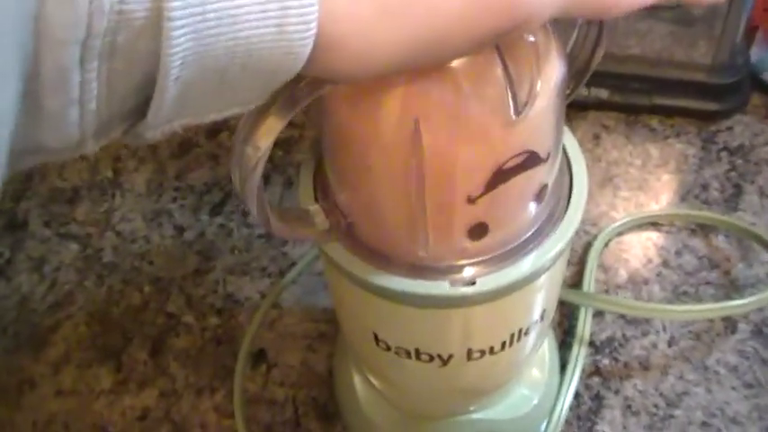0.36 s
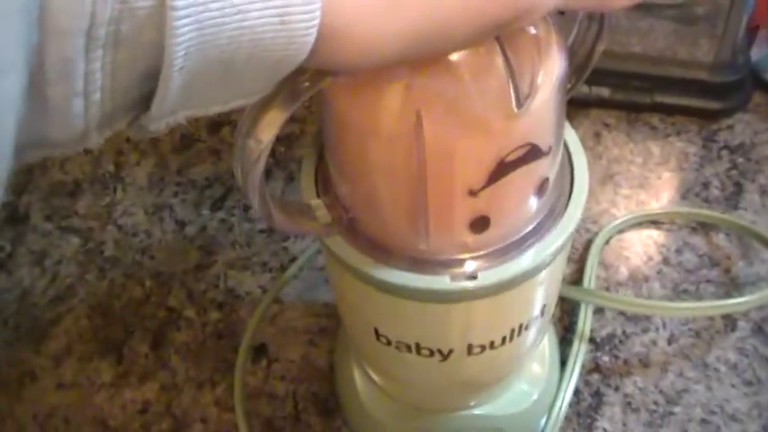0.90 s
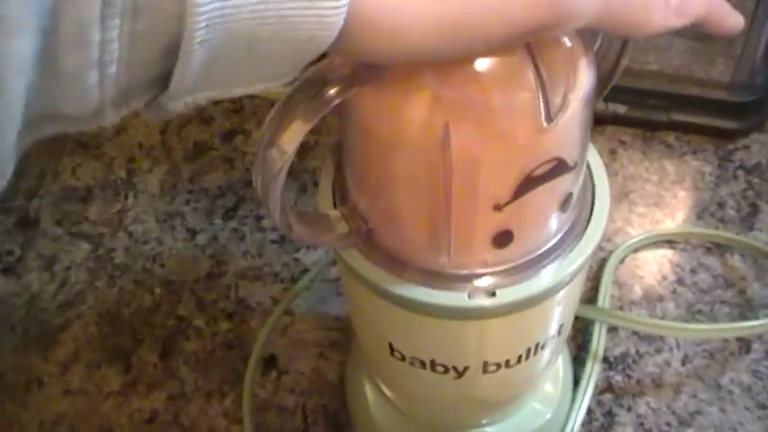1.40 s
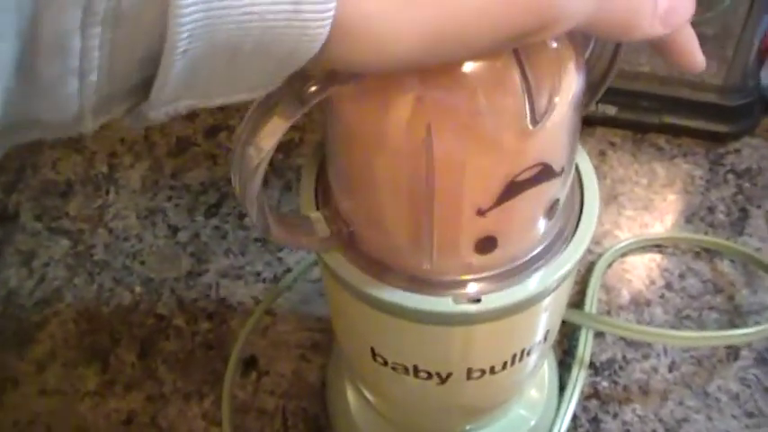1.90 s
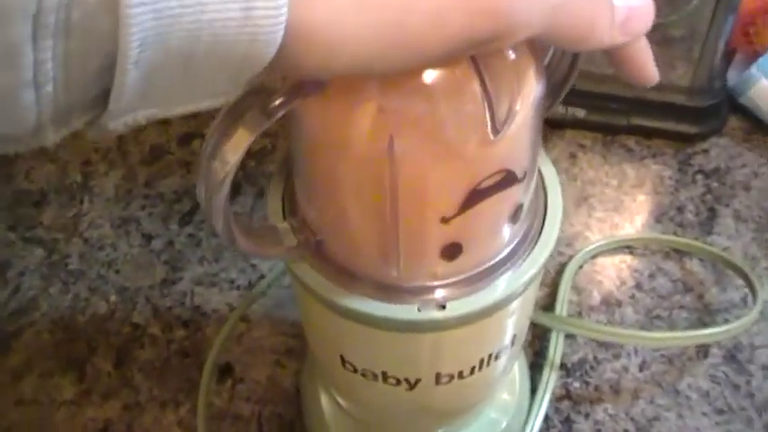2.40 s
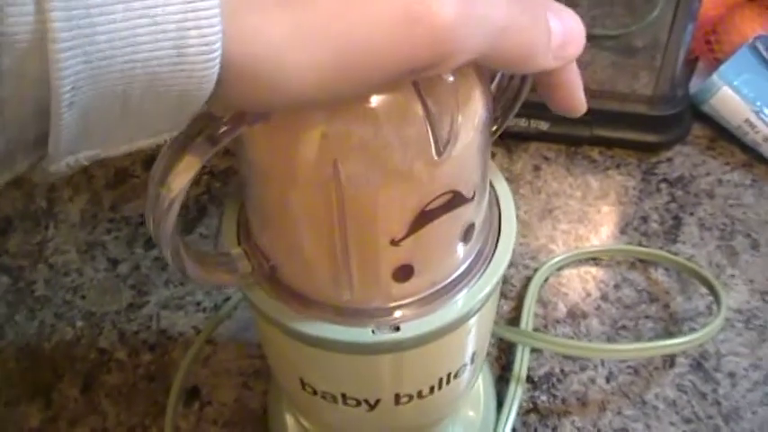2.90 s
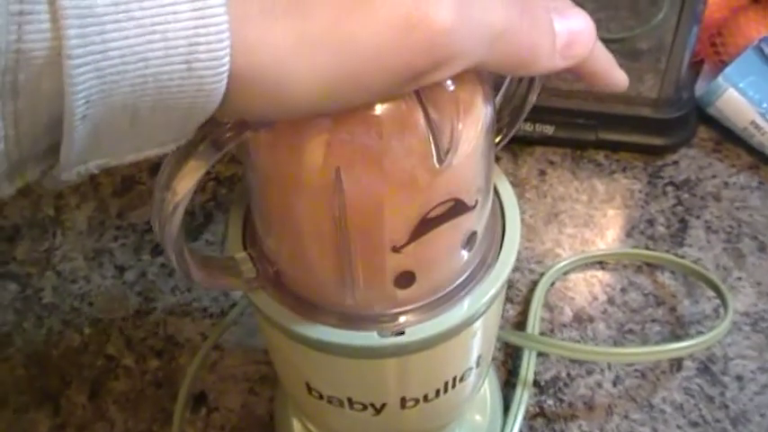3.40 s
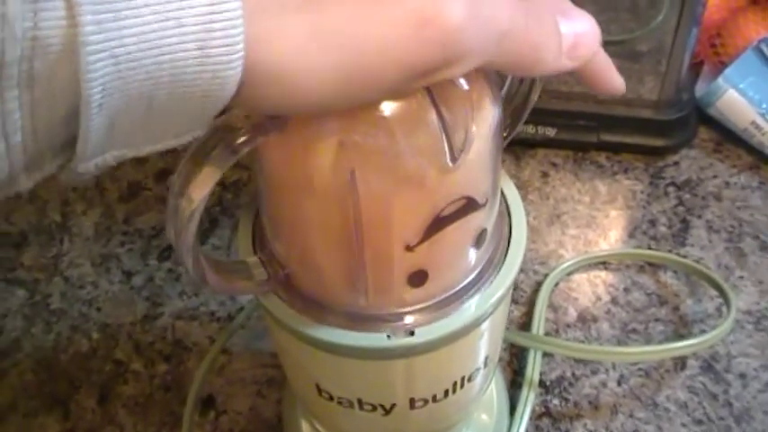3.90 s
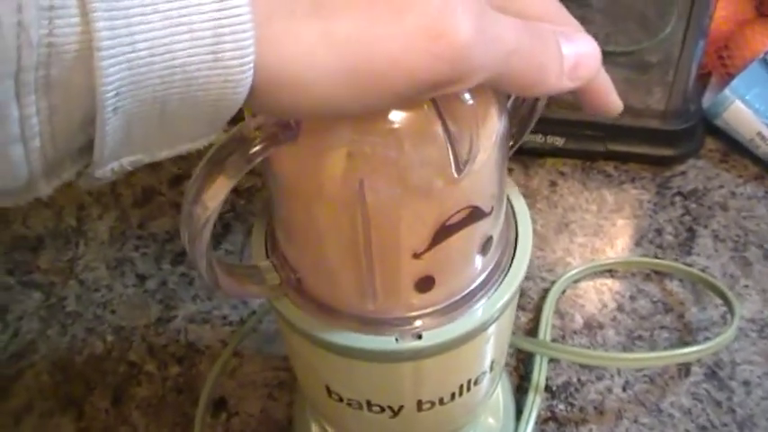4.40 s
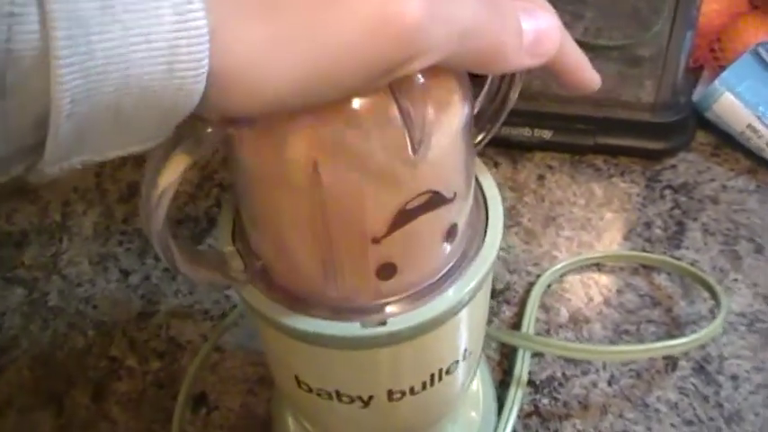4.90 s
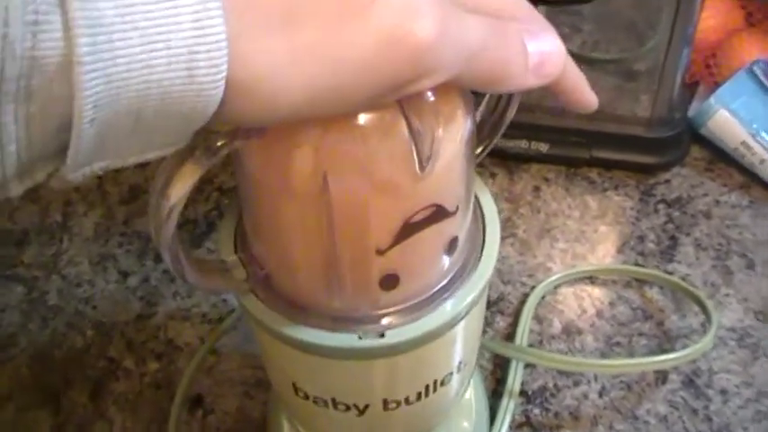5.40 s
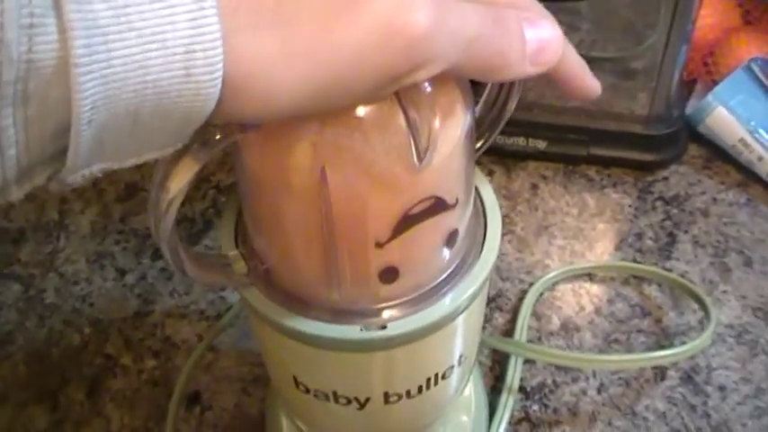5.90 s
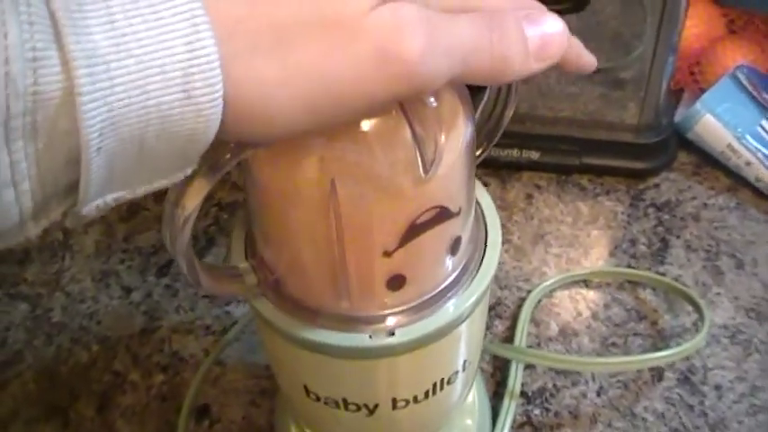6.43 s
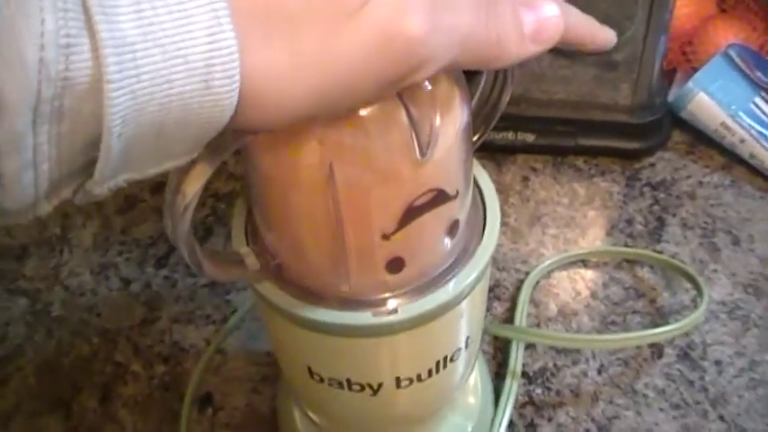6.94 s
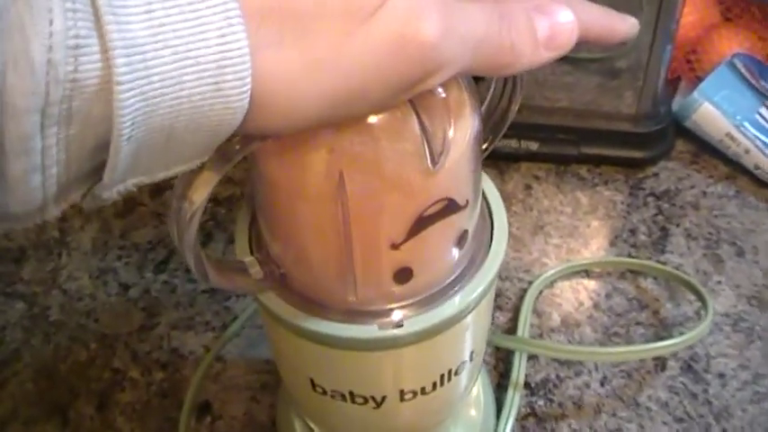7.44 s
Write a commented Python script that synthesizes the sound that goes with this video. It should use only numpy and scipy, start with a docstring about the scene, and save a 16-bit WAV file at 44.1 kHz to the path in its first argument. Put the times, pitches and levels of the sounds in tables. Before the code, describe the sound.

A close, bright, slightly overloaded take of a small blender grinding hard dried pieces in a quiet kitchen. At first a coasting blade drops a few knocks. At 0.2 s the motor kicks in with a crack and runs to 1.15 s, a dense gritty clatter on plastic with faint hum beneath; the rattle then thins, a high metallic whine sagging, until 1.7 s. A second burst lasts to 2.25 s and dies away into near silence by 2.8 s, with a soft tick at 3.0. A third, from 3.2 to 3.8 s, coasts down to stray knocks and a tiny metal clink at 4.3. Light cup ticks come around 4.6 to 4.8, then bursts at 4.84 to 5.4 and 5.55 to 6.1 s, nearly joined. Knocks thin out until 6.6 s, when the final thumping start rattles on to the end at 7.5 s.

```python
"""Pulsed blender

A small blender is pulsed by hand on a stone counter, grinding hard dried pieces to powder.
The blade flings pieces against the plastic cup: noise bursts ring its resonances, densely under power,
thinning out to lone knocks as the blade coasts down with a sagging whine. Sine tones make the mains hum
and a faint shaft tone below; shaped noise makes the quiet kitchen behind."""
import sys
import numpy as np
from scipy import signal
from scipy.fft import rfft, irfft
from scipy.io import wavfile
from scipy.ndimage import uniform_filter1d

SR = 44100
rng = np.random.default_rng(int(sys.argv[2]) if len(sys.argv) > 2 else 0)


def wav_out(sig):
    """Save sig, one row per channel (or a flat mono array), as 16-bit PCM at SR to the path in sys.argv[1]."""
    wavfile.write(sys.argv[1], SR, np.round(np.clip(np.atleast_2d(sig).T, -1, 1) * 32767).astype(np.int16))


def ratio(d):
    """dB to gain"""
    e = np.asarray(d, float) / 20
    return 10 ** e


N = 333022

# motor under power: on t/s, off t/s, shaft speed it heads for f/Hz, shaft tone level/dB before its wavering
POWER = [(0.214, 1.151, 259, -63.5), (1.727, 2.25, 257.8, -64), (3.219, 3.798, 251.2, -62),
         (4.838, 5.381, 255, -78), (5.551, 6.097, 267.3, -69), (6.643, 7.544, 269.3, -61)]
# resonances of cup wall, blade and cup body: f/Hz, width/Hz of the narrower of two stages, level/dB
WALL = [(3600, 380, -14.5), (3880, 457, -7), (4475, 720, -13), (6730, 520, -5.5), (7700, 710, -7),
        (8650, 950, -4), (9790, 1700, -11.5), (10280, 1200, -6), (11350, 1900, -8.5), (12170, 900, -8.5),
        (13800, 580, -11), (15200, 1200, -17)]
BLADE = [(4310, 630, -14.5), (4700, 640, -8), (5039, 274, -2.5)]
BODY = [(251.7, 89, -27.5), (377, 71, -15), (479, 88, -13), (590, 35, -7.5), (740, 230, -13.5),
        (859, 30, -14), (998, 34, -10.5), (1130, 320, -18), (1554, 390, -10.5), (2196, 263, -2),
        (2370, 170, -5.5), (2630, 1330, -10.5)]
HUM_HZ = 119.17  # twice the mains
STRAIN_S = 0.37  # the straining motor shakes body and hum harder just after it starts


def rms_one(x):
    """Scale to rms 1."""
    return x / np.sqrt(np.mean(x ** 2) + 1e-20)


def curve(rows):
    """Draw straight lines through (t/s, value) points, sample by sample."""
    s, values = np.transpose(rows)
    return np.interp(np.arange(N) / SR, s, values)


def smooth(x, seconds):
    """One-pole low-pass: a jump is followed with this time constant."""
    r = np.exp(-1 / (seconds * SR))
    return signal.lfilter([1 - r], [1, -r], x + 1e-18)


def drift(rate_hz):
    """Random wandering of rms 1: noise through two low-pass poles at this rate."""
    seconds = 1 / (2 * np.pi * rate_hz)
    return rms_one(smooth(smooth(rng.standard_normal(N), seconds), seconds))


def resonate(x, hz, width_hz):
    """Two-pole resonance with a gain of about 1 at its peak."""
    r = np.exp(-np.pi * width_hz / SR)
    zeros = (1 - r * r) / 2 * np.array([1, 0, -1])
    poles = [1, -2 * r * np.cos(2 * np.pi * hz / SR), r * r]
    return signal.lfilter(zeros, poles, x)


def scatter(at, sizes, modes, spread_db, burst_s, powder=0.):
    """Every blow is a short crunch of noise and strikes each resonance with a strength of its own;
    powder adds an even swirl under the blows."""
    out = 0
    luck = rng.standard_normal((len(at), len(modes)))
    white = rng.standard_normal(N)
    for k, (hz, width_hz, level_db) in enumerate(modes):
        strikes = sizes * ratio(spread_db * luck[:, k])
        power = smooth(np.bincount(at, strikes ** 2, N), burst_s)
        # each resonance reads the noise from another place
        crunch = np.sqrt(power + powder * power.mean()) * np.roll(white, k * SR // 2)
        ring = resonate(resonate(crunch, hz, 2 * width_hz), hz, width_hz)
        out = out + ratio(level_db) * ring
    return out


def powered():
    """1 while current flows, 0 while the blade coasts, with soft edges."""
    t = np.arange(N) / SR
    return smooth(sum(1. * (t > on) * (t < off) for on, off, _, _ in POWER), .01)


def since_start():
    """Seconds since the motor was last switched on; very long before the first start."""
    t, on = np.arange(N) / SR, np.array(POWER)[:, 0]
    return t - np.append(-SR, on)[np.searchsorted(on, t)]


def coasting():
    """Climbs from 0 towards 1 once the current is cut; the blade already coasts at the beginning."""
    climb_s = .2
    t, off = np.arange(N) / SR, np.array(POWER)[:, 1]
    since_off = t - np.append(-.5, off)[np.searchsorted(off, t)]
    return (1 - np.exp(-since_off / climb_s)) * (1 - powered())


def dips():
    """Sudden losses of level that heal exponentially, in dB, for rattle, whine and motor."""
    # drops right after some hard cracks: t/s, depth/dB before the onset is softened
    drops = [(0.43, 13), (2.005, 4.5), (2.165, 4.5), (3.235, 8.5), (3.344, 9.5), (3.576, 7.5), (3.782, 6.5),
             (4.878, 10), (4.99, 7), (5.31, 2.5), (6.685, 7)]
    recover_s = 0.11
    s, depth_db = np.transpose(drops)
    r = np.exp(-1 / (recover_s * SR))
    onsets = np.bincount((s * SR).astype(int), depth_db, N)
    return -smooth(signal.lfilter([1], [1, -r], onsets + 1e-18), .003)


def rattle_db():
    """Rattle level on the cup wall: each run starts at once and holds its last level until the next."""
    # one curve per run of the blade: t/s, level/dB before the dips
    runs = [
        [(0, -22.5), (.025, -33), (.055, -27.5), (.13, -44), (.2, -52)],
        [(.218, -26.5), (.3, -17), (.43, -21), (.62, -25.5), (.72, -22), (.77, -19.5), (1.0, -19.5),
         (1.2, -23.5), (1.45, -30.5), (1.53, -34), (1.59, -45), (1.65, -50.5), (1.71, -50)],
        [(1.727, -17.5), (2.0, -19.5), (2.15, -20), (2.32, -25.5), (2.5, -33), (2.56, -41.5), (2.64, -50),
         (2.73, -68.5), (2.85, -91)],
        [(3.219, -19.5), (3.3, -15.5), (3.55, -18.5), (3.76, -21.5), (3.9, -28), (4.06, -34), (4.12, -44.5),
         (4.2, -49), (4.25, -61), (4.31, -63), (4.4, -90)],
        [(4.838, -19), (4.96, -18), (5.2, -22), (5.4, -24), (5.48, -30)],
        [(5.5, -27.5), (5.56, -26.5), (5.58, -22), (5.76, -20.5), (6.0, -21.5), (6.15, -27), (6.33, -31.5),
         (6.42, -38.5), (6.5, -40.5), (6.57, -57.5), (6.63, -45)],
        [(6.645, -17.5), (6.8, -18), (7.0, -21.5), (7.2, -21), (7.35, -22.5), (7.55, -23)],
    ]
    t, out = np.arange(N) / SR, np.zeros(N)
    for run in runs:
        out = np.where(t >= run[0][0], curve(run), out)
    return smooth(out - out[0], 0.0012) + out[0] + dips()


def kitchen():
    """Dull noise of changing level with a few wavering appliance tones, made of narrow noise bands."""
    # level of the murmur: t/s, level/dB
    murmur = [(0, -57.5), (1.6, -66.5), (1.72, -55), (2.7, -69.5), (2.85, -66.5), (3.2, -56.5), (4.2, -69),
              (4.4, -66.5), (4.6, -54.5), (4.83, -54.5), (6.5, -70.5), (6.64, -52), (7.55, -69)]
    # colour of the noise: f/Hz, relative level/dB per Hz
    colour = [(20, -30), (60, -26), (120, -10), (200, -10), (400, -8), (900, -15), (1300, -20),
              (2500, -22.5), (3500, -28), (6000, -30.5), (11000, -31.5), (16000, -43.5)]
    # appliance tones: f/Hz, width/Hz of each of two equal stages, level/dB re murmur
    appliance_tones = [(118.9, 4.4, -13.5), (356, 8, -9), (744, 8, -9), (890, 11, -13), (9100, 200, -21.5),
                       (11040, 500, -21.5)]
    hz, level_db = np.transpose(colour)
    grid_hz = np.maximum(np.fft.rfftfreq(N, 1 / SR), 1)
    gain = ratio(np.interp(np.log(grid_hz), np.log(hz), level_db))
    noise = rms_one(irfft(rfft(rng.standard_normal(N)) * gain, N))
    tones = 0
    for f, width_hz, db in appliance_tones:
        band = resonate(resonate(rng.standard_normal(N), f, width_hz), f, width_hz)
        tones = tones + ratio(db) * rms_one(band)
    return ratio(curve(murmur)) * (noise + tones)


def room(x):
    """Reflections off counter and walls: a dying, dulled noise tail."""
    t60_s, level_db = 0.14, -15
    t = np.arange(SR // 3) / SR
    tail = smooth(rng.standard_normal(len(t)), .00003) * ratio(-60 * t / t60_s) * (t > .003)
    return ratio(level_db) * signal.fftconvolve(x, tail / np.sqrt(np.sum(tail ** 2)))[:N]


def motor():
    """Hum at twice the mains while powered, and the unbalanced shaft once per turn as it spins up."""
    hum_db, strain_db = -67.5, 9
    speed_lag_hz, spin_up_s, swell_s = 100, .3, 0.09
    t = np.arange(N) / SR
    hum_level_db = hum_db + strain_db * np.exp(-since_start() / STRAIN_S) + 5.0 * drift(8)
    hum = ratio(hum_level_db) * powered() * np.sin(2 * np.pi * HUM_HZ * t)
    hz, gain = np.zeros(N), np.zeros(N)
    for on, off, top_hz, level_db in POWER:
        spin_up = top_hz - speed_lag_hz * np.exp(-np.abs(t - on) / spin_up_s)
        hz = np.where(t > on, spin_up, hz)
        gain = gain + ratio(level_db) * (t > on) * (t < off)
    turns = np.cumsum(hz * (1 + 0.012 * drift(9.9))) / SR
    shaft_gain = smooth(smooth(gain, swell_s), .03) * ratio(2.0 * drift(12))
    shaft = shaft_gain * np.sin(2 * np.pi * turns)
    return (hum + shaft) * ratio(dips())


def jolts():
    """The starting torque thumps the base on the counter; the hand rocks the idle cup in its seat."""
    # jolts of the base, hard when the motor kicks in, soft by the hand: t/s, level/dB before the drive
    thump_times = [(0.217, -30.5), (1.726, -24.5), (3.217, -25), (4.6, -47), (4.84, -25.5), (6.645, -26.5)]
    # resonances of the base: f/Hz, width/Hz of the narrower stage, level/dB
    base = [(110, 30, -15), (214, 120, -12.5), (395, 140, -0.5), (620, 170, 0.5), (880, 190, -18)]
    # rocking of the cup: t/s, strike level/dB
    rocks = [(3.038, -10.5), (4.650, -5)]
    # resonances of the seat: f/Hz, width/Hz of the narrower stage, level/dB
    seat = [(1690, 290, -2), (3280, 450, 2)]
    drive_db = 44
    s, level_db = np.transpose(thump_times)
    at = np.round(s * SR).astype(int)
    thumps = scatter(at, ratio(level_db + drive_db), base, spread_db=1.0, burst_s=0.01)
    s, level_db = np.transpose(rocks)
    at = np.round(s * SR).astype(int)
    ticks = scatter(at, ratio(level_db), seat, spread_db=1.0, burst_s=0.0045)
    return thumps + ticks


def clink():
    """A small metal part clinks as the blade stops: a few decaying sine modes struck once."""
    # the strike: t/s, level/dB
    strike_s, strike_db = (4.316, -47)
    # modes of the part: f/Hz, level/dB re strike, t60/s
    modes = [(1300, -8, .08), (5114, 0, .2), (5297, -5, .2), (6132, -2, .22)]
    t = np.maximum(np.arange(N) / SR - strike_s, 0)
    return sum(ratio(strike_db + db - 60 * t / t60) * np.sin(2 * np.pi * hz * t) for hz, db, t60 in modes)


def knocks():
    """Large pieces crack against the wall; shares of each reach blade and cup body."""
    # set knocks of single pieces and of the cup in its seat:
    # t/s, level/dB before the drives, blade share/dB
    cracks = [(0.0304, -4.5, -13), (0.0932, -27, -9), (0.113, -10.5, -14), (0.1907, -22, -15),
              (0.2179, 0.5, -6), (0.4257, -2.5, -18), (0.48, -7, -16), (0.596, -3, -20), (1.0188, -3, -15),
              (1.2156, -2, -10), (1.289, -1, -12), (1.3259, -4, -10), (1.3512, -2.5, -16), (1.39, -8, -13),
              (1.4572, -11, -6), (1.48, -11, -1), (1.502, -5, -21), (1.559, -12, -14), (1.6573, -22.5, -21),
              (1.6781, -28, -25), (1.726, -10, -10), (1.8085, -2.5, -20), (1.834, -4, -13),
              (2.1484, -3, -13.5), (2.359, -1.5, -15), (2.3742, -7, -21), (2.4058, -10, -19),
              (2.5134, -4, -19.5), (2.497, -10.5, -6), (2.5917, -25, -2), (2.608, -28, -8),
              (2.7578, -53, -11), (2.9282, -46, -27), (3.037, -23, -33), (3.2198, -2.5, -14.5),
              (3.225, -14, -21), (3.2398, -3, -18), (3.3374, -3, -35), (3.431, -8, -5.5), (3.5254, -1, -18),
              (3.5342, -6, -22), (3.677, -3.5, -16), (3.7755, -8, -33), (3.897, -1, -23),
              (3.9623, -15.5, -10), (4.142, -25, 0), (4.156, -16.5, -12), (4.176, -19.5, -14),
              (4.195, -26.5, -16), (4.2682, -27, -15), (4.316, -30.5, -27), (4.411, -46.5, -32),
              (4.598, -26.5, -30.5), (4.6495, -21, -24), (4.7, -34.5, -34), (4.783, -23.5, -34),
              (4.834, -18, -25), (4.8447, -2, -2.5), (4.975, -1.5, -9.5), (5.064, -6, -23),
              (5.146, -2, -10.5), (5.1771, -2, -23), (5.2715, -3, -18), (5.3806, -2, -10.5),
              (5.5722, -4, -9.5), (6.131, -3.5, -14), (6.1724, -8, -18), (5.7027, -3, -25),
              (5.8434, -4.5, -18), (6.2083, -3, -11), (6.348, -7, -13), (6.357, -5, -12.5),
              (6.4442, -8, -10.5), (6.4877, -14.5, -9), (6.585, -29, -16), (6.621, -20, -21),
              (6.652, -8, -6), (6.98, -2.5, -14), (7.0165, -3.5, -9), (7.22, -4, -13), (7.4532, -2, -17)]
    # how strongly a short blow drives each part
    wall_drive_db, blade_drive_db, body_drive_db = 19.5, 33.5, 33.5
    # the body takes a fixed share, more when the motor has just kicked in
    body_share_db, kick_db, kick_s = -25, 15, .012
    # lesser knocks come at random, their level set over the rattle
    lesser_per_s, lesser_db, lesser_blade_db = 9, 12.5, -18.5
    lesser = np.flatnonzero(rng.random(N) < lesser_per_s / SR)
    s, level_db, blade_db = np.transpose(cracks)
    at = np.append(np.round(s * SR).astype(int), lesser)
    luck = rng.standard_normal((len(lesser), 2))
    level_db = np.append(level_db, rattle_db()[lesser] + lesser_db + 2.5 * luck[:, 0])
    blade_db = np.append(blade_db, lesser_blade_db + 4.8 * luck[:, 1])
    kicked = np.min(np.abs(at[:, None] / SR - np.array(POWER)[:, 0]), axis=1) < kick_s
    body_db = body_share_db + kick_db * kicked
    wall = scatter(at, ratio(level_db + wall_drive_db), WALL, spread_db=4.5, burst_s=0.00096)
    blade = scatter(at, ratio(level_db + blade_db + blade_drive_db), BLADE, spread_db=4.0, burst_s=0.0012)
    body = scatter(at, ratio(level_db + body_db + body_drive_db), BODY, spread_db=6.0, burst_s=0.0011)
    return wall + blade + body


def whine():
    """The coasting blade sings: a narrow noise band around a falling pitch, with a roughened level."""
    level_db, linger_s = -3.5, 0.016  # level re rattle
    pitch_hz, sag_hz, half_width_hz = 5080, 298.6, 110
    coast = coasting()
    low_pass = signal.butter(2, half_width_hz, fs=SR, output="sos")
    slow = signal.sosfilt(low_pass, rng.standard_normal((2, N)))
    phase = 2 * np.pi * np.cumsum(pitch_hz - sag_hz * coast ** 2) / SR
    band = rms_one(slow[0] * np.cos(phase) + slow[1] * np.sin(phase))
    return coast * smooth(ratio(rattle_db() + level_db), linger_s) * ratio(5.0 * drift(25)) * band


def grind():
    """Pieces and powder hit wall, blade and body; torque pulses at twice the mains bunch the hits."""
    # blade ring and cup body re the rattle: under power, and when the blade coasts
    blade_on_db, blade_coast_db, body_on_db, body_coast_db = -9.5, -3.5, -10, -9
    strain_body_db = 2
    on = powered()
    coast = coasting()
    wall_db = rattle_db()
    blade_db = wall_db + blade_on_db + (blade_coast_db - blade_on_db) * coast
    body_db = wall_db + body_on_db + (body_coast_db - body_on_db) * coast
    body_db = body_db + strain_body_db * np.exp(-since_start() / STRAIN_S)
    throb = 1 + .7 * on * np.sin(2 * np.pi * HUM_HZ * np.arange(N) / SR)
    # fewer hits once the blade coasts; pieces arrive in quick clumps
    per_s = (500 + 1500 * on) * throb * ratio(6.0 * drift(110))
    at = np.flatnonzero(rng.random(N) < per_s / SR)
    sizes = ratio(2.0 * np.minimum(rng.exponential(1, len(at)), 4))
    wall = scatter(at, sizes, WALL, spread_db=3.0, burst_s=0.00046, powder=.06)
    body = scatter(at, sizes, BODY, spread_db=4.0, burst_s=0.0049, powder=0.6)
    # slow hits stir the top blade mode less, so the ring sags as the speed runs out
    speed = smooth(on, 0.33)
    low = scatter(at, sizes, BLADE[:2], spread_db=5.0, burst_s=.002, powder=0.19)
    top = scatter(at, sizes, BLADE[2:], spread_db=4.0, burst_s=0.0014, powder=0.22)
    blade = low + top * np.clip(.3 + 3.3 * speed, 0, 1)
    out = 0
    for part, level_db in [(wall, wall_db), (blade, blade_db), (body, body_db)]:
        # the level holds over spans of a twentieth of a second
        out = out + ratio(level_db) * part / np.sqrt(uniform_filter1d(part ** 2, size=2200))
    return out


def scene():
    """Blender, its reflections and the kitchen."""
    blender = grind() + whine() + knocks() + jolts() + clink() + motor()
    return (blender + room(blender) + kitchen())[None]


def top_cut(x):
    """Nothing passes above 16.6 kHz."""
    return signal.sosfilt(signal.butter(12, 16640, fs=SR, output="sos"), x)


def record(dry):
    """Peaks are rounded at full scale, then bass and top are cut."""
    low_cut_hz, top_cut_hz = 50, 16050
    rounded = np.tanh(dry)
    thin = signal.sosfilt(signal.butter(2, low_cut_hz, "high", fs=SR, output="sos"), rounded)
    mix = signal.sosfilt(signal.cheby2(14, 60, top_cut_hz, fs=SR, output="sos"), thin)
    return top_cut(mix)


dry = scene()
out = record(dry)
wav_out(out)
```